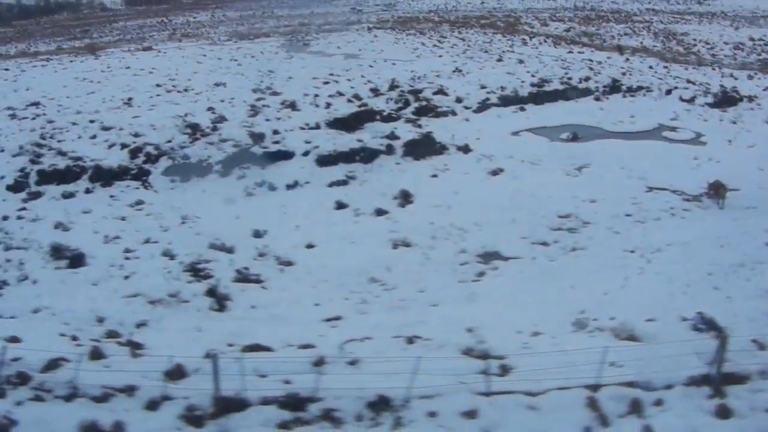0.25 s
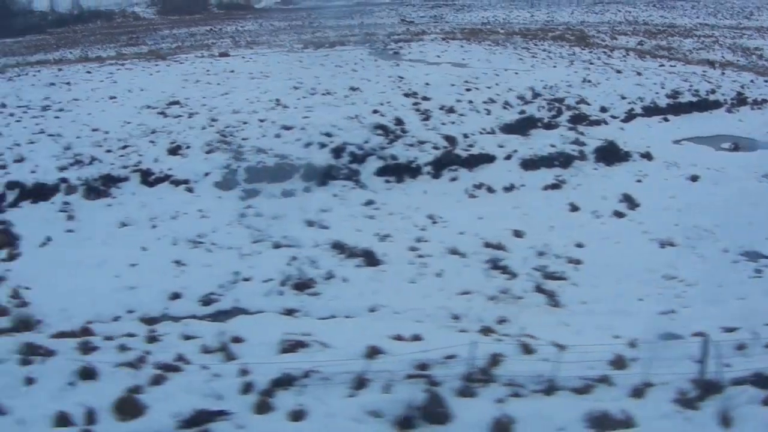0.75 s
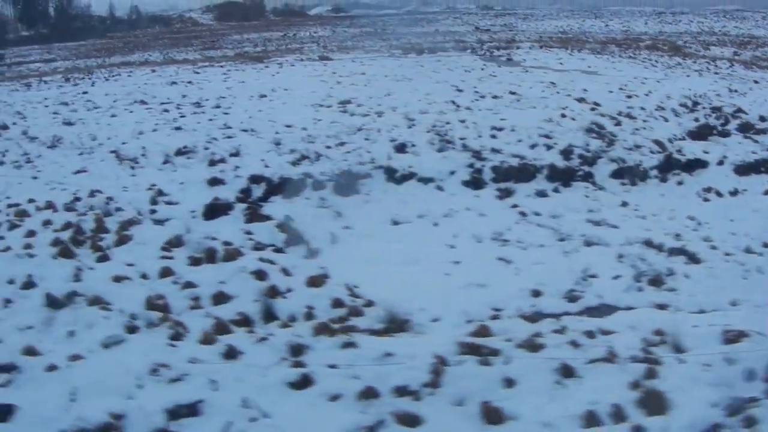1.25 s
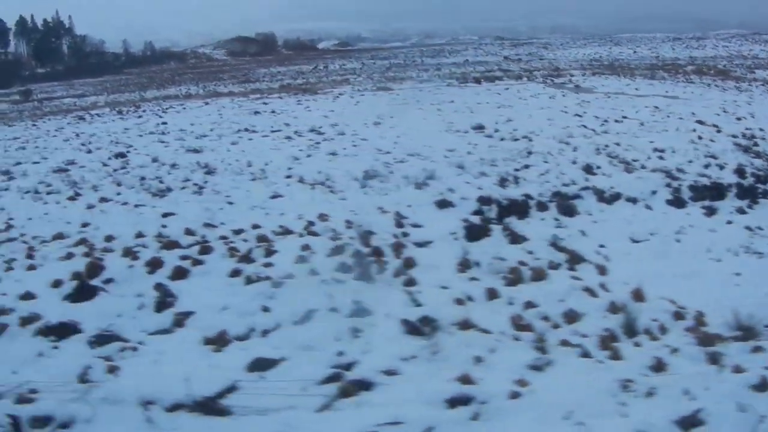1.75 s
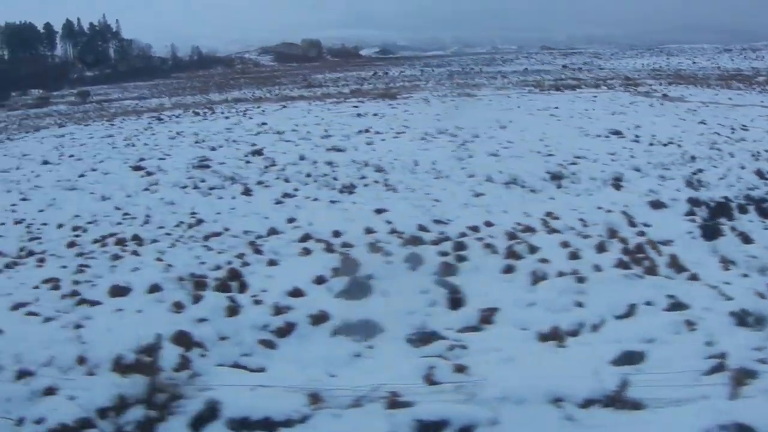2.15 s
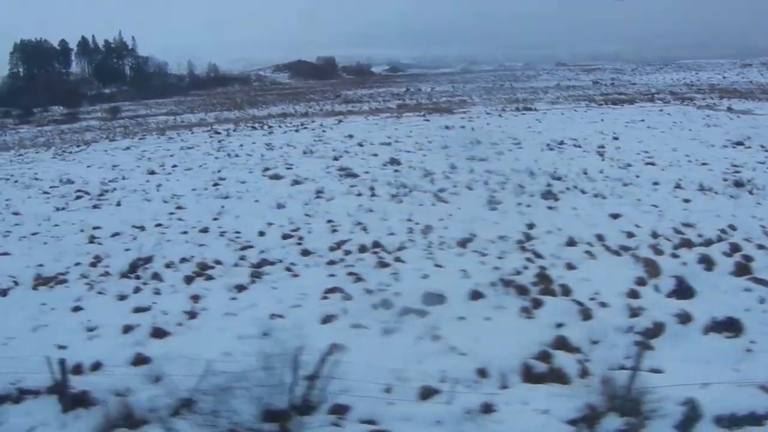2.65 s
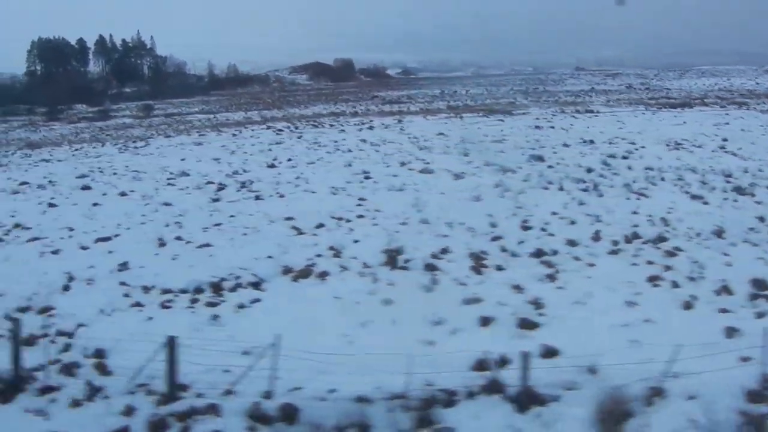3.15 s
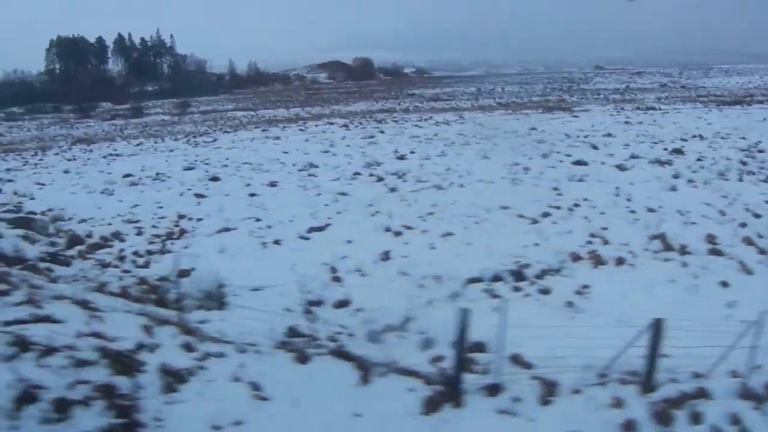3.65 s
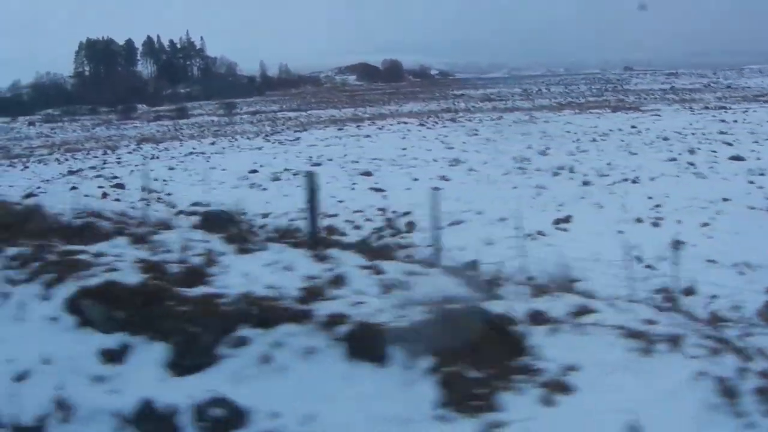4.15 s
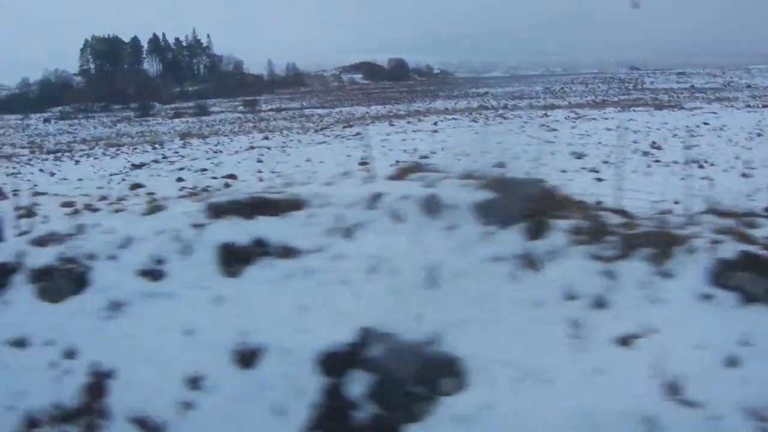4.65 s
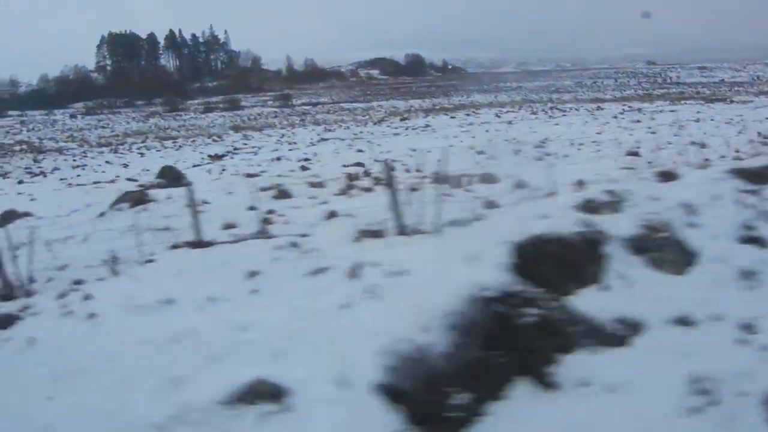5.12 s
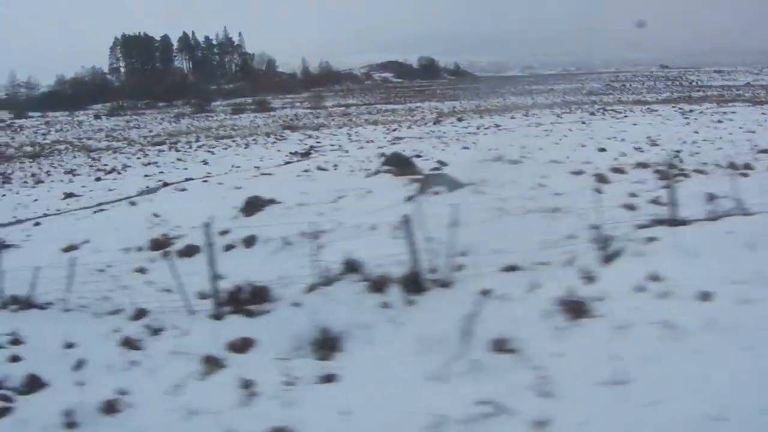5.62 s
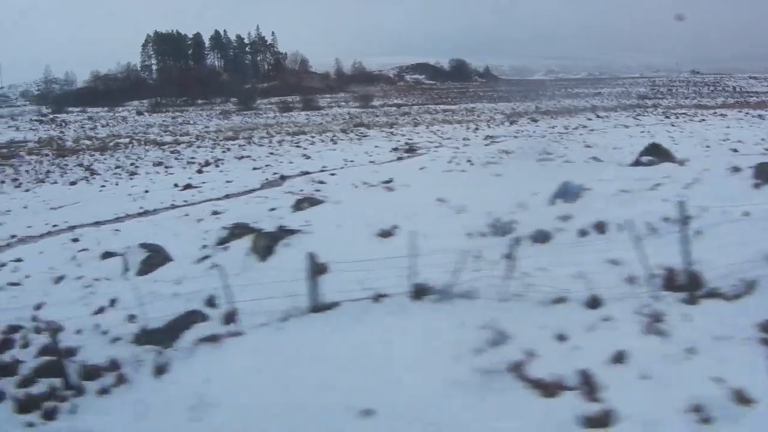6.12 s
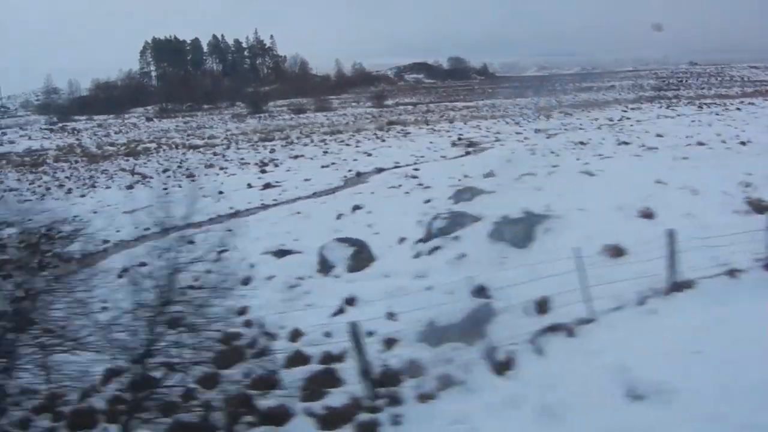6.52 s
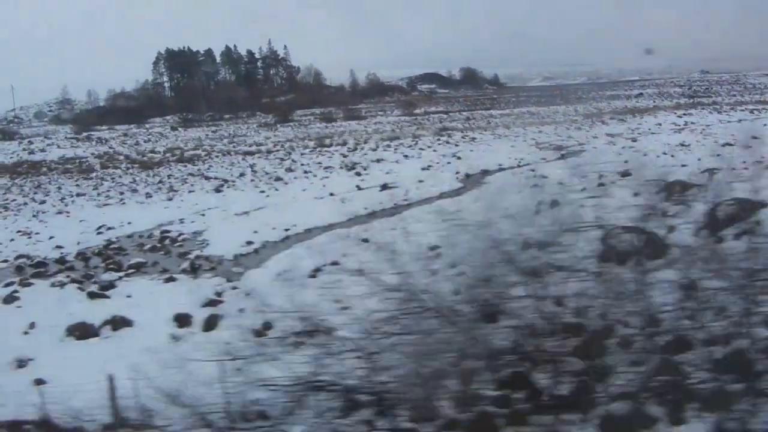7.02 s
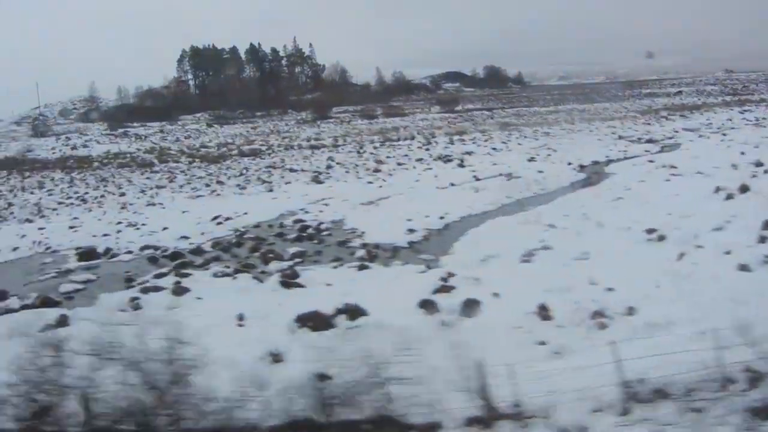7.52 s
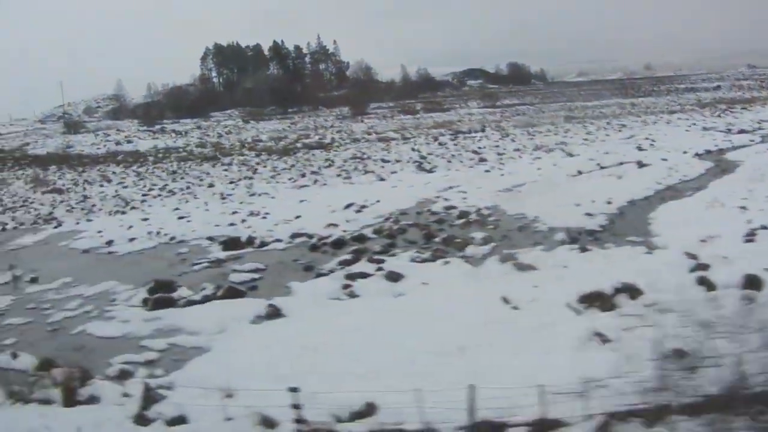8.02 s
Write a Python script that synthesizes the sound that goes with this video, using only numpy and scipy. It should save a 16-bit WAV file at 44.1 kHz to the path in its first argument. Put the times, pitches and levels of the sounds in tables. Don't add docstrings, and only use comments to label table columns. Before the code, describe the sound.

A train rolls along, heard inside the carriage through a small camera held against the window. Deep floor boom and a droning window panel run throughout, swelling and easing unevenly. Dull thuds and hard little raps come several times a second, with paired rail-joint knocks about every one and a half seconds. Fingers rustle and tick on the camera; trim squeaks briefly. The bass is close, boxy and leans strongly right, with faint hiss.

```python
import sys
import numpy as np
from scipy import signal
from scipy.fft import rfft, irfft, next_fast_len
from scipy.io import wavfile
from scipy.ndimage import uniform_filter1d, map_coordinates

SR = 44100
rng = np.random.default_rng(int(sys.argv[2]) if len(sys.argv) > 2 else 0)


def wrap_up_sound(samples):
    columns = np.atleast_2d(samples).T
    tamed = np.clip(columns, -1, 1)
    steps = np.round(tamed * 32767).astype(np.int16)
    wavfile.write(sys.argv[1], SR, steps)


def to_linear_factor(level_db):
    exponent = np.asarray(level_db, float) / 20
    return 10 ** exponent


N = 365148

# time in seconds, track roughness in dB, window shake in dB.
ROLLING = [(0.0, -31.5, -33), (0.32, -22, -23), (0.51, -34, -32.5), (0.8, -24.5, -29), (1.4, -28, -31),
           (1.56, -23, -26), (1.95, -30.5, -31), (2.49, -28.5, -20.5), (2.72, -23.5, -30),
           (3.05, -25.5, -24.5), (3.62, -24, -28), (4.15, -26.5, -30), (4.43, -22, -26.5), (4.72, -28, -27),
           (5.6, -22.5, -28), (6.35, -28, -30.5), (6.55, -24.5, -28), (8.05, -28.5, -31.5)]
# time in seconds, shift in dB.
FLOOR_SHIFT = [(0, 0), (.6, 1), (1.2, -1.5), (1.9, 1), (2.7, -1), (3.3, -.5), (4, -2), (4.7, 0), (5.3, 2.5),
               (5.9, .5), (6.5, 1.5), (7.3, 1), (8.27, 0)]
# frequency in Hz, width in Hz, level in dB.
FLOOR_MODES = [(45, 40, -10.5), (90, 16.3, 2), (128, 13.4, 2)]
# frequency in Hz, density in dB per Hz.
DRONE_SPECTRUM = [(60, -89), (100, -26), (170, -0.5), (235, 4), (300, -7), (350, -2), (410, -15),
                  (470, -20.5), (700, -75.5), (2000, -120)]
# frequency in Hz, density in dB per Hz.
HUM_SPECTRUM = [(150, -87), (300, -42), (460, 1), (700, -2), (950, -5.5), (1100, -12.5), (1300, -39),
                (2500, -120)]
# frequency in Hz, density in dB per Hz.
ROAR_SPECTRUM = [(300, -92), (700, -25), (1150, 1), (1450, 1.5), (2100, -2.5), (2800, -11), (3800, -19.5),
                 (6000, -37), (12000, -120)]
# peak time in seconds, peak in dB, rise and fall in seconds per 10 dB.
STROKES = [(.02, -59, .05, .3), (.26, -59, .4, .09), (.42, -53.5, .05, .06), (.69, -56.5, .025, .13),
           (1.05, -60, .5, .3), (1.2, -50, .03, .1), (1.28, -60, .1, .4), (1.75, -57.5, .14, .075),
           (2.1, -62, .06, .11), (2.51, -59, .3, .09), (2.81, -51.5, .12, .14), (3.14, -60, .3, .08),
           (3.45, -60, .03, .25), (3.96, -62, .12, .03), (4.44, -55.5, .33, .07), (4.55, -56, .04, .075),
           (5.08, -66, .25, .4), (5.29, -63, .3, .4), (5.34, -57.5, .08, .04), (5.73, -59, .3, .065),
           (5.89, -57, .07, .055), (6.07, -60.5, .025, .08), (6.42, -61, .1, .8), (6.87, -57, .25, .08),
           (7.1, -64, .4, .6), (7.45, -62, .4, .25), (7.68, -55.5, .035, .11), (8.05, -57.5, .28, .13),
           (8.27, -59.5, .2, .1)]
# start in seconds, peak in dB, length in seconds.
SCUFFS = [
    (0.686, -42.5, .016),
    (1.197, -37.5, .015),
    (2.78, -40.5, 0.031),
    (5.871, -48, .015),
    (6.062, -46, 0.013),
    (4.415, -47, .025),
    (7.254, -47.5, .015),
    (7.374, -49.5, .025),
]
# frequency in Hz, density in dB per Hz.
RUSTLE_SPECTRUM = [(900, -39), (2000, -5), (3000, -4.5), (4200, -11), (7000, -13.5), (10000, -44.5),
                   (14000, -120)]
# frequency in Hz, density in dB per Hz.
FIZZ_SPECTRUM = [(3000, -69), (5500, -16.5), (7500, -0.5), (9000, 1.5), (10700, 1.5), (13000, 0),
                 (15500, -6)]
# time in seconds, peak in dB.
TICKS = [(0.0004, -48), (0.1021, -46), (0.131, -41), (0.1719, -45), (0.6847, -46), (0.6907, -43),
         (1.1931, -39), (1.3198, -40), (1.3467, -44), (1.3608, -43), (1.513, -39), (1.5877, -40),
         (1.675, -48), (1.725, -45), (1.7498, -44), (2.4567, -42), (2.535, -42), (2.8892, -39),
         (2.9338, -45), (3.1122, -44), (3.4115, -53), (3.629, -39), (3.7463, -41), (3.9433, -40),
         (4.4504, -40), (4.5495, -41), (4.5698, -39), (5.3344, -44), (5.3531, -43), (5.7163, -42),
         (5.7399, -44), (5.871, -43), (5.9008, -40), (6.065, -50), (6.07, -39), (6.541, -45), (6.7799, -48),
         (6.8567, -40), (7.1111, -42), (7.2578, -36), (7.3745, -49), (7.4578, -40), (7.6579, -47),
         (8.0448, -44)]
# time in seconds, thud in dB, shudder length in seconds.
JOLTS = [(0.066, -19.5, .039), (0.242, -8.5, .025), (0.316, -6, .03), (0.885, -15, .05), (1.433, -9, .025),
         (1.845, -15, .025), (1.66, -11, .03), (2.041, -15.5, .027), (2.109, -15, .016), (2.19, -13, .03),
         (2.448, -13, .035), (2.584, -14.5, .04), (2.894, -9, .02), (3.014, -15.5, .024),
         (2.366, -14, .035), (7.213, -18, .03), (3.696, -13, .041), (3.815, -12.5, .016),
         (3.986, -15, .025), (4.403, -9, .01), (4.762, -14.5, .04), (4.891, -7.5, .014), (4.936, -14, .019),
         (5.021, -14, .04), (5.243, -22, .02), (5.318, -8.5, .03), (5.746, -9, .02), (5.843, -8, .05),
         (6.661, -10.5, .02), (7.7, -13, .022)]
# time in seconds, thud, ring and clatter in dB,
# shudder length in seconds.
AXLES = [(0.219, -9, -15.5, -30, .02), (0.384, -9, -13, -31, .04), (1.512, -8, -23, -44, .025),
         (1.716, -9, -23, -35.5, .035), (2.925, -14, -17, -33, .045), (3.096, -12.5, -18.5, -33, .03),
         (4.359, -12, -13.5, -34.5, .04), (4.538, -14, -15, -36.5, .04), (5.874, -5, -15.5, -31, .03),
         (6.052, -8, -21, -34, .035), (7.445, -8, -22, -38, .055), (7.651, -12, -18, -33, .06)]
# time in seconds, thud, ring and clatter in dB,
# shudder length in seconds.
KNOCKS = [(0.115, -7.5, -20.5, -38, .015), (0.179, -4.5, -22.5, -41, .015), (0.338, -12, -21, -38, .032),
          (0.668, -14, -29.5, -38, .05), (0.74, -13, -28, -39, .04), (0.916, -20, -21.5, -44, .02),
          (1.199, -30, -26.5, -33.5, .02), (1.556, -9.5, -20, -35, .035), (1.772, -14, -22, -41, .025),
          (2.274, -13, -20, -42, .13), (3.608, -15, -27, -46, .03), (2.423, -9.5, -15.5, -36, .065),
          (2.505, -13, -15.5, -43, .025), (2.615, -15, -18, -38, .07), (3.428, -19, -25, -38, .025),
          (3.929, -4, -22.5, -40, .01), (4.097, -15.5, -31, -45, .025), (4.436, -7, -28, -44, .03),
          (4.851, -13, -25, -44, .034), (5.297, -9, -15.5, -38, .07), (5.714, -10.5, -25, -42, .025),
          (6.178, -16, -21, -43, .085), (6.405, -16.5, -25, -36, .045), (8.019, -15.5, -20.5, -32, .03)]
# frequency in Hz, width in Hz, level in dB.
PANEL_LOW = [(191.5, 41.4, -8), (221.4, 37.3, -1), (265.2, 22.7, -4), (346.7, 15.2, -4.5), (406, 27.5, -11)]
# frequency in Hz, width in Hz, level in dB.
PANEL_HIGH = [(511.5, 40.8, 0), (649, 84, -6), (768, 71, -7.5), (935, 22.4, -5.5), (1050, 28.5, -10.5)]
# time in seconds, peak in dB.
RAPS = [(0.108, -30), (0.172, -31), (0.221, -22), (0.344, -28), (0.387, -24), (0.674, -33), (0.691, -27),
        (1.198, -25), (1.303, -32), (1.361, -30), (1.391, -35), (1.513, -28), (1.552, -28), (1.662, -33),
        (1.727, -25), (1.791, -29), (2.059, -34), (2.272, -31), (2.291, -29), (2.398, -28), (2.445, -23),
        (2.507, -26), (2.624, -28), (2.834, -30), (2.927, -25), (3.09, -24), (3.105, -22), (3.164, -30),
        (3.415, -34), (3.426, -30), (3.621, -30), (3.717, -36), (3.747, -32), (3.931, -34), (3.944, -27),
        (4.361, -23), (4.447, -29), (4.547, -25), (4.87, -33), (4.93, -31), (5.277, -32), (5.313, -23),
        (5.717, -28), (5.761, -33), (5.844, -29), (5.869, -21), (6.055, -28), (6.063, -23), (6.114, -31),
        (6.189, -32), (6.229, -30), (6.401, -32), (6.862, -31), (7.111, -30), (7.257, -30), (7.45, -26),
        (7.541, -35), (7.655, -24), (7.665, -19), (8.25, -33)]
# frequency in Hz, width in Hz, level in dB.
SHELL_MODES = [(600, 300, 0), (1000, 450, -2), (1500, 600, -7), (2200, 800, -10)]
# start in seconds, pitch in Hz, width in Hz, level in dB, length in seconds.
SQUEAKS = [
    (0.97, 1400, 500, -50, .12),
    (1.005, 787, 30.4, -41, .04),
    (1.192, 1433, 70.3, -45.5, .025),
    (4.89, 1600, 1300, -48.5, 0.26),
    (4.969, 1780, 160, -51, .08),
    (5.131, 2630, 25, -59, 0.07),
    (7.659, 2000, 700, -43, 0.078),
]
# start in seconds, number of steps, peak in dB.
LENS_RUNS = [
    (0.9926, 1, -49),
    (1.019, 1, -52),
    (1.3794, 1, -53),
    (1.5783, 1, -57),
    (2.908, 4, -52),
    (3.9443, 2, -55.5),
    (4.1006, 9, -49),
    (5.8706, 1, -53),
]
# frequency in Hz, width in Hz, level in dB.
LENS_MODES = [(5110, 110, -2), (5730, 110, -2), (6330, 100, -3.5), (7850, 500, -13), (9640, 150, -6),
              (10250, 230, -1), (10700, 300, -1), (11700, 350, -5), (13500, 200, -3), (15400, 180, -4.5)]
# frequency in Hz, left minus right in dB.
PORT_BALANCE = [(60, -18.5), (110, -17.5), (200, -18.5), (380, -19), (700, -16.5), (1290, -13), (2380, -10),
                (4400, -3.0), (8120, 0.5), (15000, 6)]
# frequency in Hz, likeness from 0 to 1.
PORT_LIKENESS = [(60, 0.97), (300, 1), (640, 0.73), (1400, .58), (2800, .45), (5500, .2), (15000, .25)]
# frequency in Hz, lead of the left in radians.
PORT_LEAD = [(60, .03), (300, .1), (1030, .6), (2580, 0.68), (6000, 2.6), (15500, 2.7)]


def along(points, hz):
    f, value = np.transpose(points)
    return np.interp(np.log(hz + 1), np.log(f + 1), value)


def curves(rows):
    s, *columns = np.transpose(rows)
    return [np.interp(np.arange(N) / SR, s, column) for column in columns]


def wobble(rate):
    t = np.arange(0, N + 16, 16) / SR
    knots = rng.standard_normal(int(N * rate / SR) + 4)
    return np.interp(np.arange(N) / SR, t, map_coordinates(knots, [t * rate]))


def filtered(x, response):
    m = next_fast_len(N + SR // 2)
    h = response(np.fft.rfftfreq(m, 1 / SR))
    h = h / np.sqrt(np.mean(np.abs(h) ** 2))
    return irfft(rfft(x, m) * h, m)[..., :N]


def modes(table, top_hz=20000):
    def response(f):
        shut = 1 / (1 + 1.4j * f / top_hz - (f / top_hz) ** 2)
        total = 0
        for k, (centre, width, db) in enumerate(table):
            resonance = 1j * f * width / (centre ** 2 - f ** 2 + 1j * f * width)
            total = total + (-1) ** k * to_linear_factor(db) * resonance
        return shut ** 2 * total
    return response


def colour(points):
    return lambda f: to_linear_factor(along(points, f))


def noise(patchy_db=0):
    x = rng.standard_normal((2, N))
    if patchy_db:
        z = signal.stft(x, nperseg=512)[2]
        field = uniform_filter1d(rng.standard_normal(z.shape[1:]), 6, 0)
        field = uniform_filter1d(field, 10, 1)
        x = signal.istft(z * to_linear_factor(patchy_db * field / field.std()), nperseg=512)[1][:, :N]
    return x / x.std()


def steady(x, span, share):
    level = np.sqrt(np.abs(uniform_filter1d(x ** 2, round(span * SR))) + .02)
    y = x / level ** share
    return y / y.std()


def bursts(times, levels_db, lengths, rise, fade):
    power = np.zeros(N + SR)
    for s, db, hold in zip(times, levels_db, np.broadcast_to(lengths, len(times))):
        t = np.arange(round((hold + fade) * SR)) / SR
        shape = (1 - np.exp(-t / rise)) * to_linear_factor(db - 60 * np.maximum(t - hold, 0) / fade)
        start = max(round((s - rise) * SR), 0)
        power[start:][:len(t)] += shape ** 2
    return np.sqrt(power[:N])


def strikes(times, levels_db):
    push = np.zeros((2, N))
    sign = np.sign(rng.standard_normal(len(times)))
    push[0, np.round(times * SR).astype(int)] = to_linear_factor(levels_db) * sign
    return push


def rubbing():
    t = np.arange(0, N, 64) / SR
    power = to_linear_factor(2 * -79)
    for s, db, rise, fall in STROKES:
        power = power + to_linear_factor(2 * (db - 10 * np.maximum((s - t) / rise, (t - s) / fall)))
    return np.interp(np.arange(N) / SR, t, 10 * np.log10(power))


def contacts():
    soft = [(s, db, db - 20, db - 34, hold) for s, db, hold in JOLTS]
    return np.transpose(AXLES + KNOCKS + soft)


def wheels():
    rumble_db, drone_db = curves(ROLLING)
    roar_db = -52 + .48 * (rubbing() + 65)

    sway_hz = 28.7 * (1 + 0.1956 * wobble(7))
    sway = to_linear_factor(-31 + 3.6 * wobble(7)) * np.sin(2 * np.pi * np.cumsum(sway_hz) / SR)

    flex_db, = curves(FLOOR_SHIFT)
    rail = noise()
    lower = filtered(rail, modes(FLOOR_MODES[:2], top_hz=260))
    upper = filtered(rail, modes(FLOOR_MODES[2:], top_hz=260))
    floor = to_linear_factor(.8 - flex_db) * lower + to_linear_factor(flex_db) * upper
    boom = to_linear_factor(rumble_db) * steady(floor, span=0.044, share=0.17)

    drone = to_linear_factor(drone_db + 2.2 * wobble(17)) * filtered(noise(), colour(DRONE_SPECTRUM))
    hum_db = (drone_db + roar_db) / 2 - 3 + 1.8 * wobble(14)
    hum = to_linear_factor(hum_db) * filtered(noise(), colour(HUM_SPECTRUM))
    roar_db = roar_db + 0.5 + 0.65 * wobble(18)
    roar = to_linear_factor(roar_db) * filtered(noise(patchy_db=2.2), colour(ROAR_SPECTRUM))
    return sway + boom + drone + hum + roar


def whine():
    return to_linear_factor(-86) * np.sin(2 * np.pi * 15734 * np.arange(N) / SR)


def preamplifier_hiss():
    return to_linear_factor([[-79], [-92]]) * noise()


def rustle():
    s, db, hold = np.transpose(SCUFFS)
    scuffs = bursts(s, db - 12, hold, rise=.002, fade=0.25)
    rub_db = 20 * np.log10(np.hypot(to_linear_factor(rubbing()), scuffs))
    grains = to_linear_factor(1.8 * wobble(400) + 0.7 * wobble(30) + wobble(7))
    dull = filtered(grains * noise(patchy_db=1.5), colour(RUSTLE_SPECTRUM))
    bright = filtered(grains * noise(patchy_db=-1.0), colour(FIZZ_SPECTRUM))
    bright_db = rub_db - 7.0 + 0.2 * (rub_db + 58.5)
    return to_linear_factor(rub_db + 1.5) * dull + to_linear_factor(bright_db) * bright


def ticks():
    s, db = np.transpose(TICKS)
    edge = to_linear_factor(8) * strikes(s, db)[0]
    crackle = bursts(s, db - 7, .0006, rise=.0003, fade=0.012) * noise()
    snaps = to_linear_factor([[1.5], [-1.5]]) * (edge + crackle)
    return filtered(snaps, colour([(300, -22), (1500, 3), (4000, 0.5), (8000, -1.5), (15000, -6)]))


def jolts():
    s, db, ring_db, _, hold = contacts()
    struck = filtered(strikes(s, db + 15.0), modes(PANEL_LOW, top_hz=700))
    low = steady(filtered(noise(), modes(PANEL_LOW[:3], top_hz=700)), span=.02, share=0.75)
    middle = steady(filtered(noise(), modes(PANEL_LOW[3:], top_hz=700)), span=.03, share=0.7)
    middle_db = db + .65 * (ring_db - db) - 6.5
    low_shudder = bursts(s, db - 7.5, hold, rise=0.0075, fade=0.14) * low
    middle_shudder = bursts(s, middle_db, hold, rise=0.005, fade=0.15) * middle
    return struck + low_shudder + middle_shudder


def raps():
    s, db = np.transpose(RAPS)
    rattle = bursts(s, db - 17, .008, rise=.0008, fade=.09) * noise()
    return filtered(strikes(s, db + 14) + rattle, modes(SHELL_MODES, top_hz=2900))


def knocks():
    s, _, db, clatter_db, hold = contacts()
    hold = .85 * hold
    panel = modes(PANEL_HIGH, top_hz=1500)
    struck = filtered(strikes(s, db + 13.5), panel)
    ring = steady(filtered(noise(), panel), span=0.011, share=0.47)
    ring = bursts(s, db - 10.0, hold, rise=0.0022, fade=0.23) * ring
    trim = to_linear_factor(3.2 * wobble(150)) * filtered(noise(), colour(ROAR_SPECTRUM))
    clatter = bursts(s, clatter_db - 9, hold, rise=0.005, fade=0.2) * trim
    return struck + ring + clatter


def squeaks():
    out = np.zeros((2, N))
    t = np.arange(SR // 3) / SR
    for s, hz, width, db, hold in SQUEAKS:
        drift = rng.standard_normal((2, 2, len(t)))
        for _ in range(2):
            drift = uniform_filter1d(drift, round(SR / width))
        tone = drift[0] * np.cos(2 * np.pi * hz * t) + drift[1] * np.sin(2 * np.pi * hz * t)
        shape = (1 - np.exp(-t / 0.0056)) * to_linear_factor(db - 60 * np.maximum(t - hold, 0) / .12)
        out[:, round(s * SR):][:, :len(t)] += shape * steady(tone, span=.02, share=.6)
    return out


def lens():
    step_s = .0531
    steps = [(s + k * step_s, db) for s, count, db in LENS_RUNS for k in range(round(count))]
    s, db = np.transpose(steps)
    db = db + 2 * rng.standard_normal(len(db))
    click = bursts(s, db - 6.5, .001, rise=.0005, fade=.02) * noise()
    buzz = bursts(s, db - 16, 0.048, rise=.003, fade=.1) * to_linear_factor(2.5 * wobble(120)) * noise()
    gear = modes([(7000, 3000, -9), (10500, 2500, -4.5), (13600, 1200, -1.5), (15300, 800, -3)])
    return filtered(click, gear) + filtered(buzz, modes(LENS_MODES))


def ports(pair):
    m = next_fast_len(N + SR // 2)
    hz = np.fft.rfftfreq(m, 1 / SR)
    a, b = rfft(pair, m)
    lean = to_linear_factor(along(PORT_BALANCE, hz))
    alike = np.clip(along(PORT_LIKENESS, hz), 0, 1)
    lead = np.exp(1j * along(PORT_LEAD, hz))
    right = 2 / np.sqrt(1 + lean ** 2 + 2 * lean * alike * lead.real)
    left = right * lean * (alike * lead * a + np.sqrt(1 - alike ** 2) * b)
    return irfft([left, right * a], m)[:, :N]


def scene():
    through_body = wheels() + rustle() + jolts() + raps() + knocks() + squeaks() + lens()
    return ports(through_body) + ticks() + whine() + preamplifier_hiss()


def low_pass(x):
    return signal.sosfilt(signal.butter(12, 15830, fs=SR, output="sos"), x)


def record(dry):
    limited = dry / (1 + np.abs(dry / .98) ** 8) ** (1 / 8)
    passband = np.fft.rfftfreq(N, 1 / SR) < 15830
    mix = irfft(rfft(limited) * passband, N)
    return low_pass(mix)


dry = scene()
out = record(dry)
wrap_up_sound(out)
```